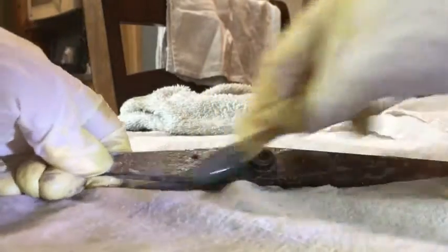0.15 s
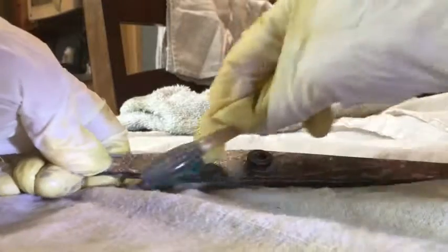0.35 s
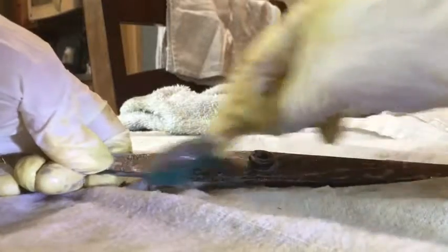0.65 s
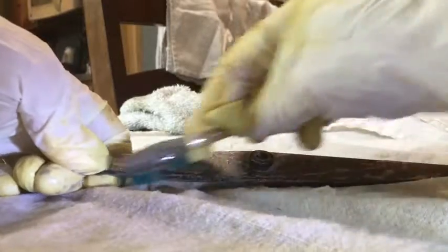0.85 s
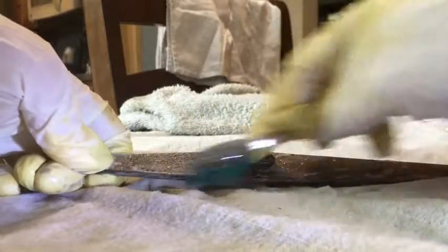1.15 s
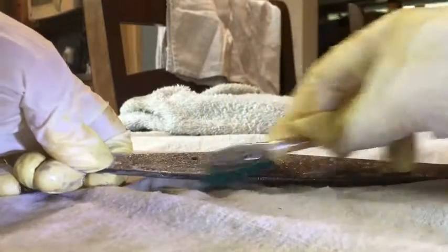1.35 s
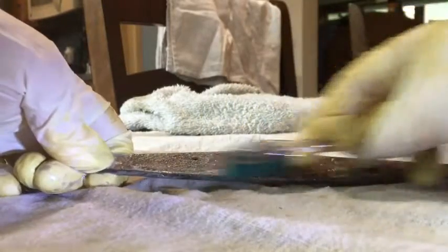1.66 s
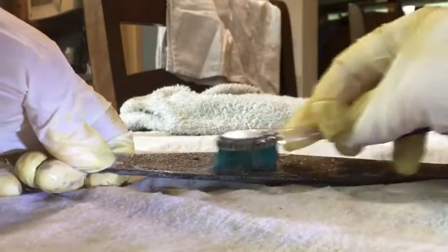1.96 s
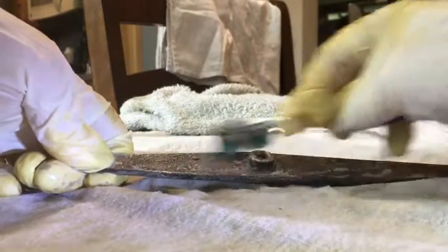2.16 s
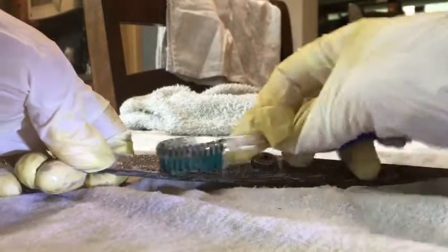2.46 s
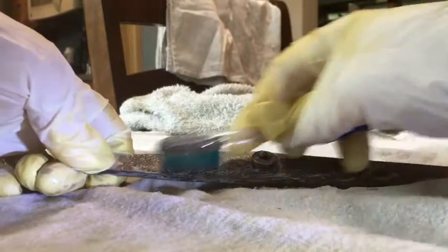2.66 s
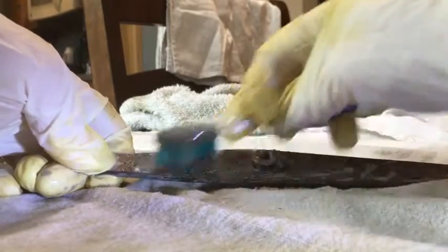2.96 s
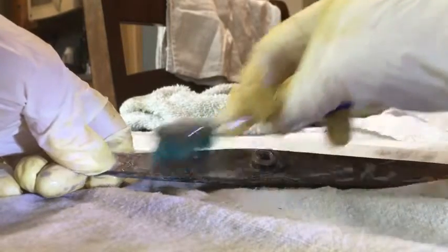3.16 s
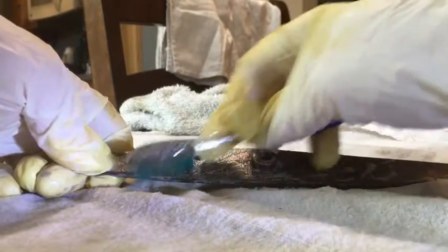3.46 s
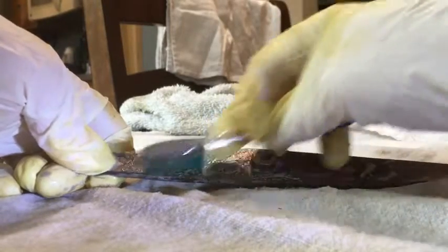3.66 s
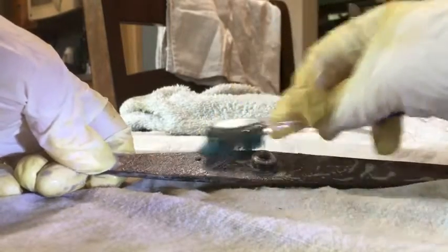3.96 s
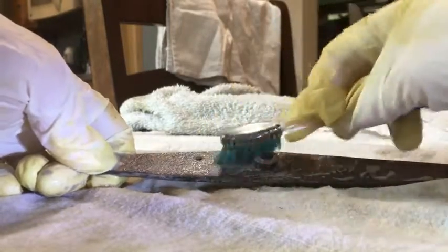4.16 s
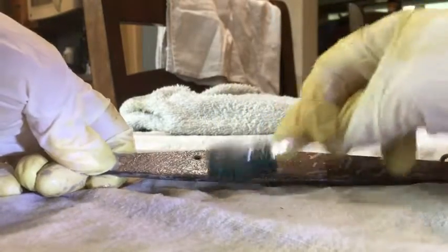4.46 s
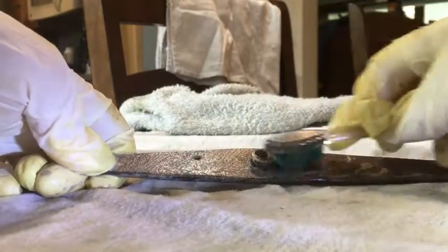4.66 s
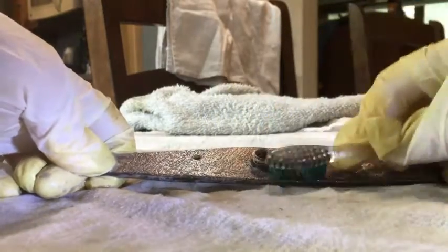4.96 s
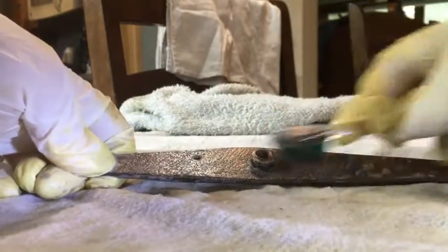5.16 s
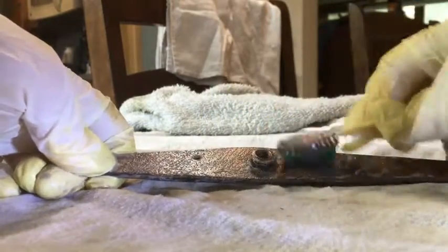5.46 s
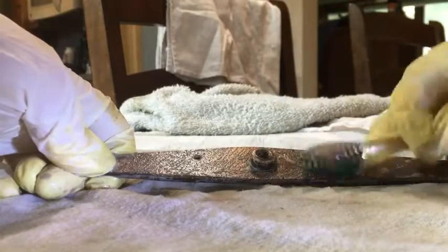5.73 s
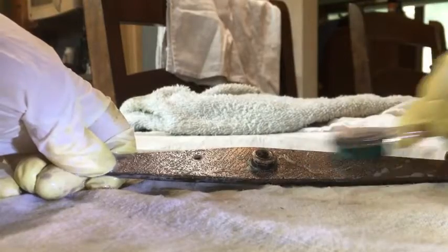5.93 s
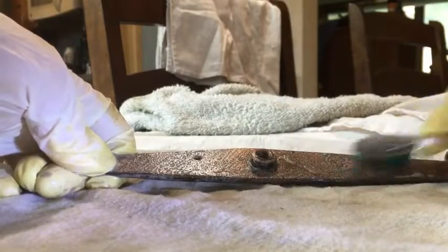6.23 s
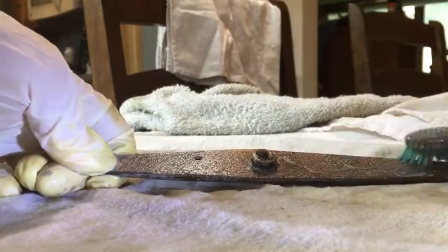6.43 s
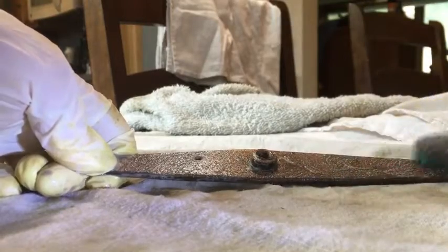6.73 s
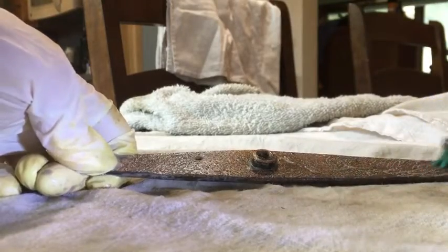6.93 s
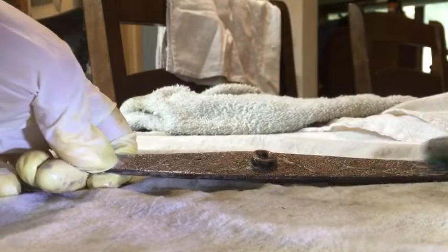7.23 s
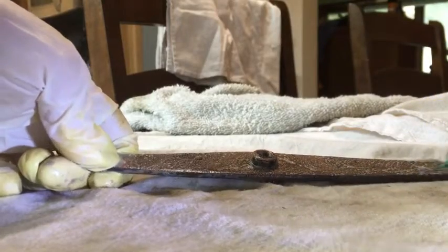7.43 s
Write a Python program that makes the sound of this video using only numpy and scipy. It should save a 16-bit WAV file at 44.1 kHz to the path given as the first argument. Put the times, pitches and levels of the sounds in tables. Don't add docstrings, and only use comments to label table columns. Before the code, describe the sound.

A toothbrush scrubs a rusty steel strap on a towel, heard very close and dry in a quiet room with a faint low fridge or fan hum. From 0 s, short bright rasps alternate back and forth about eight or nine times a second, each swelling then dropping away, with a thin muffled drumming from the strap. A sharp bristle tick comes near 0.4 s and a plastic-on-metal clack at 1.3 s. Around 2.3 s there is another double-toned knock and small scuffs, then a very brief lull near 2.45 s. From 2.5 to 4.5 s the strokes are tighter, quicker and more even. After 4.6 s they become longer and uneven, strong and weak in turn, with a dull tap at 5.15 s. From 6 s the sizzle brightens; bristle ticks cluster around 7.1 s with the hardest ringing knock, then a lighter one at 7.35 s, scrubbing to the end.

```python
import sys
import numpy as np
from scipy import signal
from scipy.fft import rfft, irfft
from scipy.io import wavfile
from scipy.ndimage import uniform_filter1d

SR = 44100
rng = np.random.default_rng(int(sys.argv[2]) if len(sys.argv) > 2 else 0)


def file_out(sig):
    cols = np.atleast_2d(sig).T
    lim = np.clip(cols, -1, 1)
    pcm = np.round(lim * 32767).astype(np.int16)
    wavfile.write(sys.argv[1], SR, pcm)


def nominal_scale(level):
    x = np.asarray(level, float) / 20
    return 10 ** x


N = 334710

# pitch_hz, level_db, t60_s
BOLT_MODES = [(5170, -27, 0.0074), (6280, 1, 0.018), (8480, 0, 0.02), (9450, -11, 0.0091),
              (11840, 2, 0.023), (13600, -10, 0.012), (14600, -18, .008)]


def level(x, db):
    return x * nominal_scale(db) / np.sqrt(np.mean(x ** 2))


def colour(x, points):
    hz, db = np.transpose(points)
    grid_hz = np.maximum(np.fft.rfftfreq(8192, 1 / SR), 1)
    gain_db = np.interp(np.log(grid_hz), np.log(hz), db, left=-60, right=-60)
    cepstrum = irfft(gain_db * np.log(10) / 20)
    cepstrum[1:4096] *= 2
    cepstrum[4097:] = 0
    response = irfft(np.exp(rfft(cepstrum)))
    return signal.fftconvolve(x, response)[:N]


def band(x, hz, width):
    b, a = signal.iirpeak(min(hz, 0.45 * SR), max(hz / width, 0.3), SR)
    return signal.lfilter(b, a, x)


def walk(rate):
    hold = int(SR / rate)
    steps = np.repeat(rng.standard_normal(N // hold + 1), hold)
    return 0.93 * uniform_filter1d(steps, hold)[:N]


def ring(modes, centre_hz, octaves):
    t = np.arange(2048) / SR
    sound = np.zeros(2048)
    for hz, db, t60_s in modes:
        distance = np.log2(hz / centre_hz) / max(octaves, 0.1)
        gain = nominal_scale(db) / (1 + distance ** 4)
        sound += gain * np.sin(2 * np.pi * hz * t) * np.exp(-np.log(1000) * t / t60_s)
    return sound / abs(sound).max()


def room():
    # frequency_hz, density_db
    air_colour = [(27, -34), (35, -5), (50, 1), (75, -3.5), (103, -11), (140, -4), (181, -8), (240, -10),
                  (285, -13), (310, -12), (350, -17.5), (500, -19), (730, -26.5), (860, -27), (1300, -27),
                  (1800, -35), (2400, -36)]
    # pitch_hz, width_hz, level_db
    motor_lines = [(40.28, 3.1, -52.5), (119.54, 3.36, -51), (132.7, 7.6, -57), (223, 3.6, -62),
                   (234.1, 3.3, -60)]
    air = level(colour(rng.standard_normal(N), air_colour), -45.5)
    air = air * nominal_scale(1.27 * walk(1.41))
    hum = np.zeros(N)
    for hz, width_hz, db in motor_lines:
        line = band(band(rng.standard_normal(N), hz, width_hz), hz, width_hz)
        hum += level(line, db)
    hiss = level(band(rng.standard_normal(N), 7000, 14000), -62)
    return air + hum + hiss


def strokes():
    # start_s, speeding_up_s, slowing_down_s, fastest_level_db
    left = [(0.008, 0.042, 0.041, -31), (0.227, 0.066, 0.034, -30.5), (0.347, 0.039, 0.073, -30),
            (0.516, 0.02, 0.037, -33.5), (0.596, 0.039, 0.061, -32), (0.737, 0.031, 0.052, -31),
            (0.845, 0.049, 0.05, -32.5), (0.987, 0.039, 0.059, -30), (1.116, 0.045, 0.062, -35.5),
            (1.239, 0.058, 0.041, -31), (1.356, 0.043, 0.032, -36), (1.47, 0.062, 0.052, -30),
            (1.606, 0.067, 0.04, -32), (1.758, 0.041, 0.054, -31.5), (1.867, 0.031, 0.066, -33.5),
            (1.987, 0.063, 0.026, -35.5), (2.094, 0.043, 0.046, -32.5), (2.234, 0.036, 0.033, -34.5)]
    # start_s, speeding_up_s, slowing_down_s, fastest_level_db
    around_bolt = [(2.52, 0.018, 0.046, -32), (2.611, 0.054, 0.031, -32.5), (2.722, 0.055, 0.027, -33.5),
                   (2.84, 0.031, 0.035, -33.5), (2.947, 0.019, 0.05, -30.5), (3.042, 0.045, 0.028, -33.5),
                   (3.143, 0.039, 0.039, -33.5), (3.251, 0.022, 0.037, -31), (3.35, 0.029, 0.034, -31),
                   (3.439, 0.03, 0.034, -32), (3.542, 0.025, 0.044, -35.5), (3.637, 0.026, 0.048, -33),
                   (3.745, 0.021, 0.035, -32), (3.84, 0.038, 0.02, -34), (3.929, 0.04, 0.019, -35),
                   (4.01, 0.045, 0.044, -33), (4.126, 0.036, 0.029, -32), (4.211, 0.048, 0.039, -32),
                   (4.326, 0.012, 0.07, -35), (4.413, 0.032, 0.05, -37.5)]
    # start_s, speeding_up_s, slowing_down_s, fastest_level_db
    right = [(4.578, 0.04, 0.075, -38.5), (4.649, 0.046, 0.057, -29.5), (4.75, 0.027, 0.03, -38),
             (4.893, 0.062, 0.034, -33.5), (4.997, 0.06, 0.032, -33), (5.113, 0.064, 0.078, -32),
             (5.25, 0.047, 0.019, -32.5), (5.34, 0.045, 0.125, -33.5), (5.517, 0.048, 0.06, -39),
             (5.605, 0.075, 0.049, -29), (5.74, 0.083, 0.046, -34.5), (5.876, 0.084, 0.058, -29),
             (6.027, 0.052, 0.066, -33), (6.147, 0.083, 0.055, -28), (6.303, 0.065, 0.023, -33),
             (6.414, 0.065, 0.079, -29.5), (6.569, 0.081, 0.018, -36), (6.689, 0.059, 0.052, -29.5),
             (6.846, 0.041, 0.031, -36), (6.938, 0.039, 0.066, -30), (7.052, 0.08, 0.037, -35.5),
             (7.186, 0.067, 0.031, -31.5), (7.3, 0.074, 0.035, -32.5), (7.429, 0.075, 0.026, -31),
             (7.566, 0.011, 0.012, -38)]
    return np.array(left + around_bolt + right)


def stroke_db(t, creep_db):
    # start_s, speeding_up_s, slowing_down_s, fastest_level_db
    scuffs = [
        (0.145, 0.026, 0.015, -33.5),
        (2.303, 0.013, 0.008, -32),
        (2.35, 0.017, 0.038, -40.5),
        (2.415, 0.021, 0.008, -49),
        (4.848, 0.017, 0.042, -37),
        (6.809, 0.02, 0.006, -41),
    ]
    halt_db, halt_s = 3.5, 0.0082
    rise_drop_db, fall_drop_db, drop_curve = 11, 10.5, 1.97
    edge_share = 0.07

    begin = strokes()[1:, 0]
    end = strokes()[:-1, :3].sum(axis=1)
    turns = (begin + end) / 2
    k = np.clip(np.searchsorted(turns, t), 1, len(turns) - 1)
    away = np.minimum(abs(t - turns[k - 1]), abs(t - turns[k]))
    power = nominal_scale(2 * (creep_db - halt_db * np.exp(-(away / halt_s) ** 2)))
    for start, rise, fall, top_db in list(strokes()) + scuffs:
        top, stop = start + rise, start + rise + fall
        near = slice(max(int((start - 0.015) * SR), 0), int((stop + 0.015) * SR))
        s = t[near]
        edge = edge_share * (rise + fall)
        off = np.where(s < top, (top - s) / rise, (s - top) / fall)
        drop_db = np.where(s < top, rise_drop_db, fall_drop_db) * off ** drop_curve
        breaking_loose = 1 + np.tanh((s - start) / edge)
        stopping = 1 + np.tanh((stop - s) / (0.91 * edge))
        loose = breaking_loose * stopping / 4
        power[near] += nominal_scale(2 * (top_db - drop_db)) * loose ** 2
    return 10 * np.log10(power)


def flicks():
    # start_s, peak_db, centre_hz
    lone_tufts = [(0.1528, -20, 8700), (0.2133, -21, 12400), (0.3792, -7, 8400), (1.4037, -17, 10900),
                  (1.4265, -16, 11800), (1.4346, -27, 11600), (2.1265, -14, 8800), (2.3036, -22, 11600),
                  (2.3675, -20, 9800), (2.3946, -21, 10200), (2.7157, -25, 11500), (2.858, -14, 9200),
                  (3.7615, -21, 10100), (3.8809, -20, 11500), (4.3343, -15, 8600), (4.5953, -18, 11000),
                  (4.5981, -15, 11100), (4.7656, -23, 9400), (4.7837, -24, 9900), (5.344, -25, 6900),
                  (5.8022, -19, 11100), (6.0423, -23, 11000), (6.852, -20, 12800), (7.0759, -25, 13700),
                  (7.0934, -20, 13100), (7.1117, -11, 13100), (7.118, -12, 12800), (7.363, -15, 12800),
                  (7.3656, -12, 13200), (7.5766, -20, 13300)]
    width_hz = 5300
    out = np.zeros(N + SR)
    t = (np.arange(128) - 32) / SR
    stops = strokes()[:, :3].sum(axis=1)
    chance = rng.standard_normal((len(stops), 2))
    stop_db = -33 + 2.5 * chance[:, 0]
    stop_hz = 11800 * (1 + 0.1 * chance[:, 1])
    for s, db, hz in lone_tufts + list(zip(stops, stop_db, stop_hz)):
        steepness = np.where(t < 0, 2.4, 1.1)
        tick = np.exp(-(t * width_hz * steepness) ** 2) * np.sin(2 * np.pi * hz * t)
        out[int(s * SR) - 32:][:128] += nominal_scale(db - 2) * tick
    return out[:N]


def knocks():
    # pitch_hz, level_db, t60_s
    strap_modes = [(814, 11, 0.012), (1160, 12, 0.026), (1400, 8, 0.031), (1990, -14, 0.03),
                   (2230, 2, 0.034), (2800, 1, 0.023), (3200, 5.5, 0.015), (3600, -4, 0.033),
                   (4030, 2.5, 0.024), (4970, -8, .01)]
    # start_s, peak_db, hardness_centre_hz, spread_octaves
    bolt_blows = [
        (1.322, -23, 6800, .7),
        (2.3157, -20, 6600, 0.48),
        (2.3884, -30.5, 7500, 0.58),
        (5.152, -33.5, 4900, 0.6),
        (7.1001, -11.5, 12000, 0.53),
        (7.3458, -24, 15000, .7),
    ]
    # start_s, peak_db, hardness_centre_hz, spread_octaves
    strap_blows = [
        (1.3224, -17, 3900, 0.48),
        (2.3156, -21, 2180, 0.85),
        (3.156, -42, 1340, 0.33),
        (2.155, -35, 3100, .4),
        (3.909, -36.5, 2800, .6),
        (5.151, -31, 2400, .95),
        (6.862, -38, 1600, 0.93),
        (7.1, -24.5, 4200, .8),
        (7.3458, -26, 3200, 0.43),
        (7.3462, -33, 1160, .45),
    ]
    out = np.zeros(N)
    t = np.arange(256) / SR
    for modes, blows in ((BOLT_MODES, bolt_blows), (strap_modes, strap_blows)):
        for s, db, hz, spread in blows:
            chance = rng.standard_normal((2, 256))
            contact = chance[0] * (abs(chance[1]) > 1.6) * np.exp(-t / 0.00065)
            contact[0] = 3.5
            crack_width_hz = 1.13 * spread * hz
            crack = chance[1] * t * np.exp(-t / 0.00067)
            crack = band(band(crack, hz, crack_width_hz), hz, crack_width_hz)
            hit = np.convolve(contact, ring(modes, hz, spread))
            hit = 0.95 * hit / abs(hit).max()
            hit[:256] += 0.86 * crack / abs(crack).max()
            out[int(s * SR):][:len(hit)] += nominal_scale(db) * hit
    return out


def strap(push, t):
    # frequency_hz, density_db
    drum_colour = [(350, -25), (700, -5.5), (880, -10.5), (1350, -4.5), (1800, -5.5), (2300, -2.5),
                   (2900, -1), (3700, -3.5), (4400, 0), (4900, -9), (5600, -2.5)]
    # start_s, end_s, pitch_hz, width_hz, level_over_drumming_db
    free_stretches = [
        (0, 1.7, 765, 150, -19),
        (.7, 3.2, 1400, 300, -28),
        (3.64, 3.7, 620, 200, -5.5),
        (3.84, 3.92, 580, 260, 1),
        (2.11, 2.16, 3200, 500, -3),
        (6.7, 8.2, 1156, 257, -12.5),
    ]
    drum = colour(push, drum_colour)
    shifts = sum(0.3 * walk(22) * band(drum, hz, 0.31 * hz) for hz in (1500, 2400, 3800))
    out = level(drum + shifts, 0)
    for start, end, hz, width_hz, db in free_stretches:
        fade_s = 0.26 * (end - start)
        there = np.clip(np.minimum(t - start, end - t) / fade_s + 0.5, 0, 1)
        there = there * nominal_scale(1.1 * walk(25))
        out = out + there * level(band(band(push, hz, width_hz), hz, width_hz), db)
    return out * nominal_scale(1.57 * walk(60))


def slips(per_s, scatter_db):
    chance = rng.random((3, N))
    share = np.clip(per_s / SR, 1e-3, 1)
    size_db = np.minimum(-scatter_db * np.log(1 - chance[1]), 12)
    size = nominal_scale(size_db) * np.sign(chance[2] - 0.5)
    return (chance[0] < share) / np.sqrt(share) * size / np.sqrt(np.mean(size ** 2))


def brush():
    # start_s, creep_at_turns_db, tip_sizzle_over_shaft_rasp_db,
    # extra_sizzle_on_every_other_stroke_db, strap_over_bristles_db
    hand = [(0, -30.5, -3, -1, -18), (0.06, -40, -2.5, 0, -15), (0.22, -38.5, 0.5, -6, -15),
            (0.5, -51, -4.5, 1, -13), (1.2, -54, -2, -1.5, -12.5), (1.5, -51, -1, 0, -14),
            (2.21, -52, -0.5, -0.5, -13), (2.33, -41.5, 1, 5, -11.5), (2.47, -75, -2, -6, -13),
            (2.6, -53, 1, -.4, -14), (3.3, -49.5, 0.2, 0.5, -15.5), (3.95, -54, -0.2, 1, -14.5),
            (4.55, -45, -1.2, 0, -14), (4.83, -52, 1.5, 1, -15.5), (5.5, -43.5, .6, 1.5, -15.5),
            (6.1, -44, 2.5, 1.5, -16.5), (6.95, -47.5, 5.5, 0.3, -16), (7.59, -44, 3.5, -2.2, -15.5)]
    # frequency_hz, density_db
    shaft_colour = [(4200, -21), (5000, -10), (6300, 0), (7500, -2.5), (9600, 0), (10500, -5.5),
                    (11500, -31)]
    # frequency_hz, density_db
    tip_colour = [(9500, -19), (10500, -2), (11700, 1.5), (13000, -0.5), (15000, -1.5), (16000, 0)]
    # centre_hz, depth
    patches = [(6400, 0.13), (8000, 0.17), (9400, 0.27), (11800, 0.19), (13200, 0.21), (14800, .2)]
    rocks_per_s = 14

    t = np.arange(N) / SR
    hand_s, *courses = np.transpose(hand)
    creep_db, tip_db, swing_db, strap_db = (np.interp(t, hand_s, c) for c in courses)
    speed_db = stroke_db(t, creep_db)
    tops = strokes()[:, :2].sum(axis=1)
    lean = np.interp(t, tops, (-1.0) ** np.arange(len(tops)))
    tip = nominal_scale(tip_db - 0.06 * (speed_db + 32.5) - swing_db * lean)
    per_s = 11000 * nominal_scale(0.3 * (speed_db + 33))

    tufts = slips(0.3 * per_s, scatter_db=3.5)
    tips = level(colour(1.1 * tufts + slips(per_s, scatter_db=-2.0), tip_colour), 0)
    tips = tips * nominal_scale(1.9 * walk(90))
    shafts = level(colour(0.65 * tufts + slips(per_s, scatter_db=2.0), shaft_colour), 0)
    shafts = shafts * nominal_scale(0.82 * walk(70))
    bolt = level(signal.fftconvolve(tufts, ring(BOLT_MODES, 9200, 0.61))[:N], -20.5)
    bristles = (tip * tips + shafts + bolt) / np.sqrt(1 + tip ** 2)
    rocking = sum(depth * walk(rocks_per_s) * band(bristles, hz, 0.19 * hz) for hz, depth in patches)
    bristles = level(bristles + rocking, 0)

    speed_db = speed_db + 0.98 * walk(170)
    early_db = np.interp(t + 0.00083, t, speed_db)
    load_db = 0.72 * (early_db + 34.5) - 35.5 + strap_db
    push = 0.4 * tufts + slips(per_s, scatter_db=1.5)
    return bristles * nominal_scale(speed_db - 0.6) + strap(push, t) * nominal_scale(load_db)


def scene():
    near = brush() + knocks() + flicks()
    echo_t60_s, echo_db = 0.11, -14
    t = np.arange(8192) / SR
    echo = rng.standard_normal(8192) * np.exp(-np.log(1000) * t / echo_t60_s) * (t > 0.002)
    echo = echo / np.sqrt(np.sum(echo ** 2))
    near = near + nominal_scale(echo_db) * signal.fftconvolve(near, echo)[:N]
    return np.tile(near + room(), (2, 1))


def low_pass(x):
    return signal.sosfilt(signal.butter(12, 17080, fs=SR, output="sos"), x)


def record(dry):
    top_cut = signal.ellip(12, 0.3, 80, 15820, fs=SR, output="sos")
    mix = signal.sosfilt(top_cut, dry)
    return low_pass(mix)


dry = scene()
out = record(dry)
file_out(out)
```